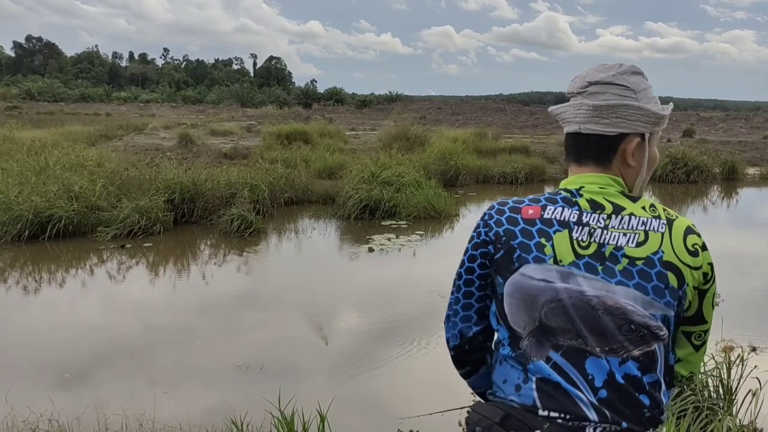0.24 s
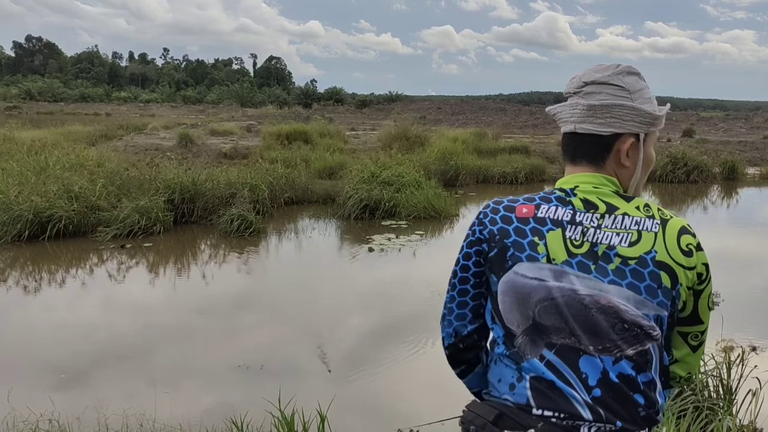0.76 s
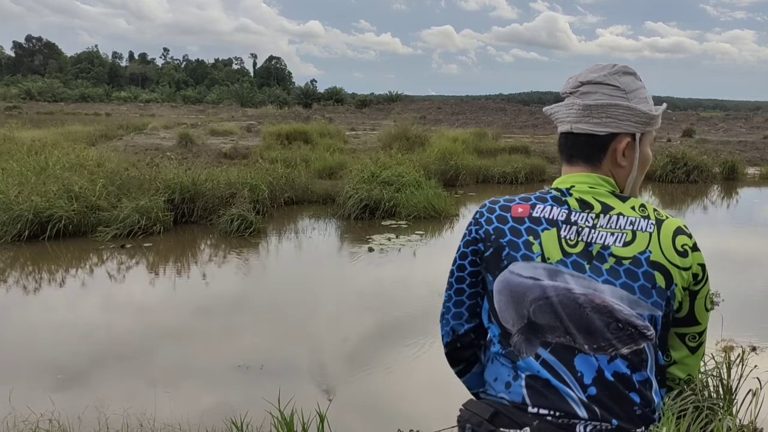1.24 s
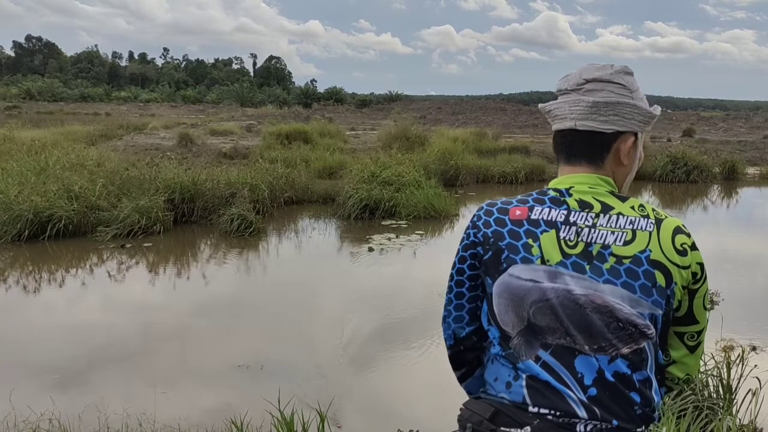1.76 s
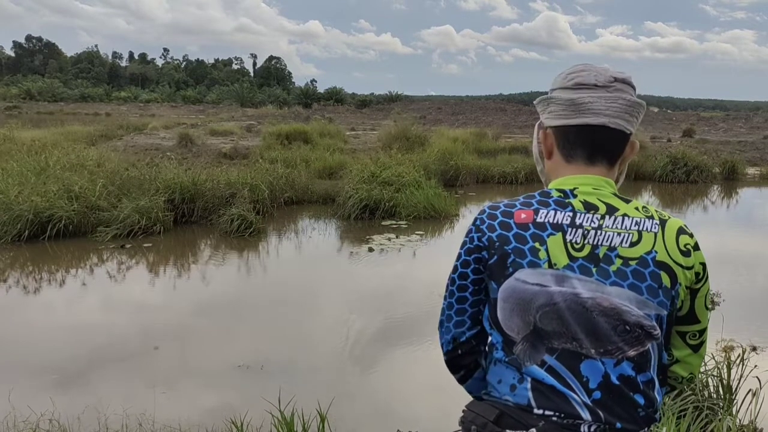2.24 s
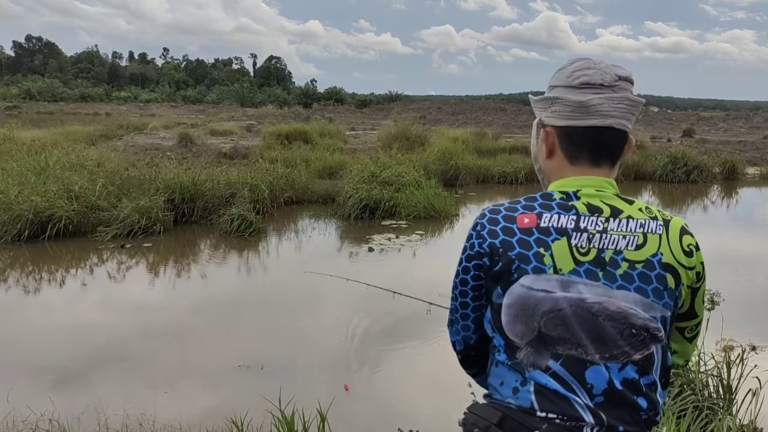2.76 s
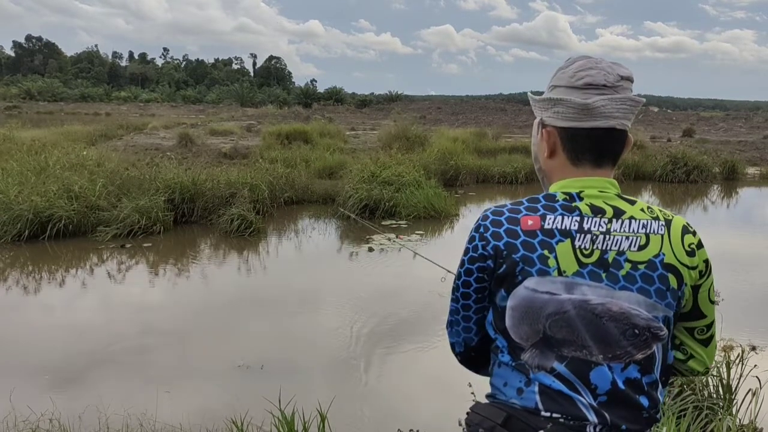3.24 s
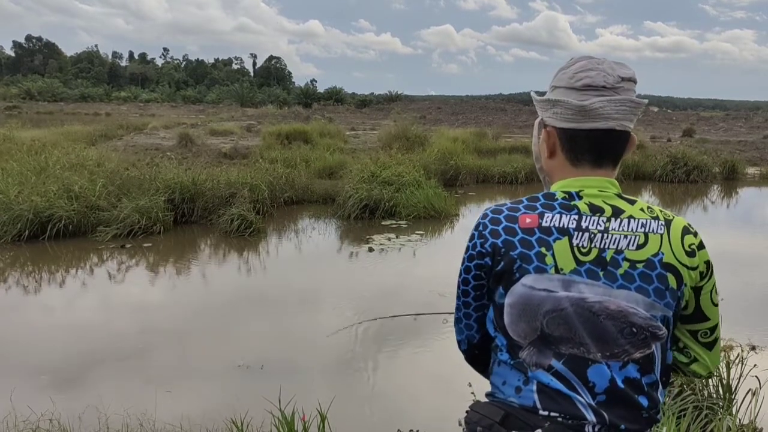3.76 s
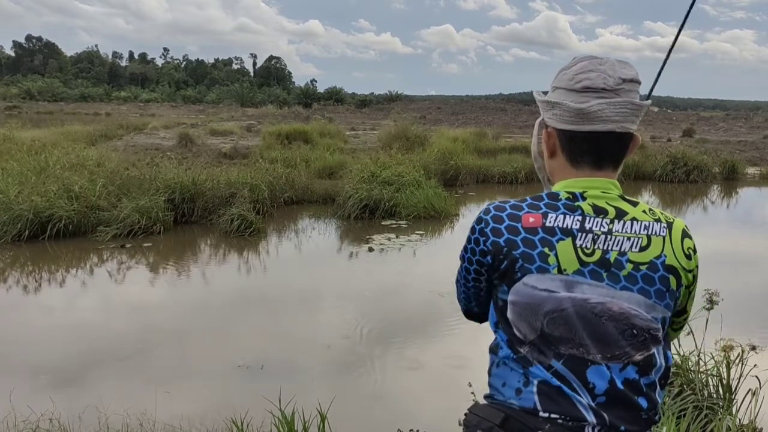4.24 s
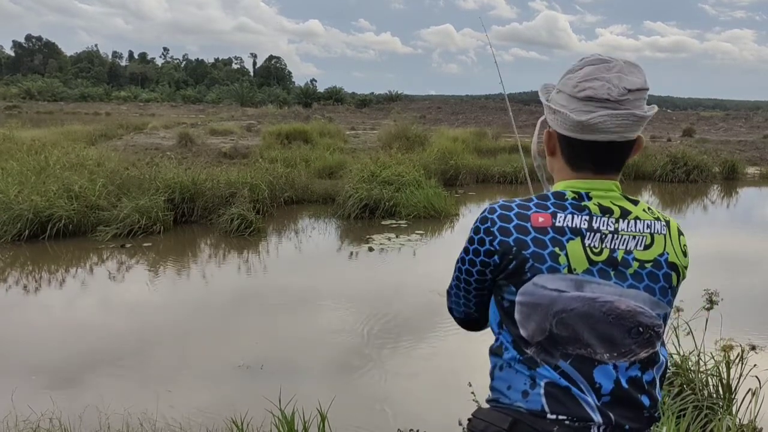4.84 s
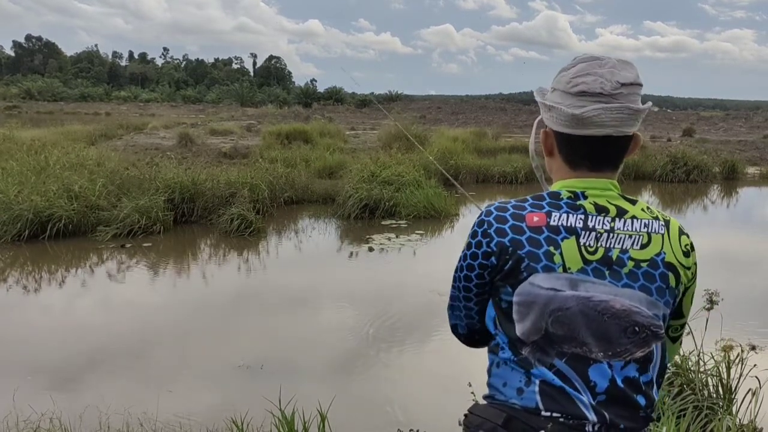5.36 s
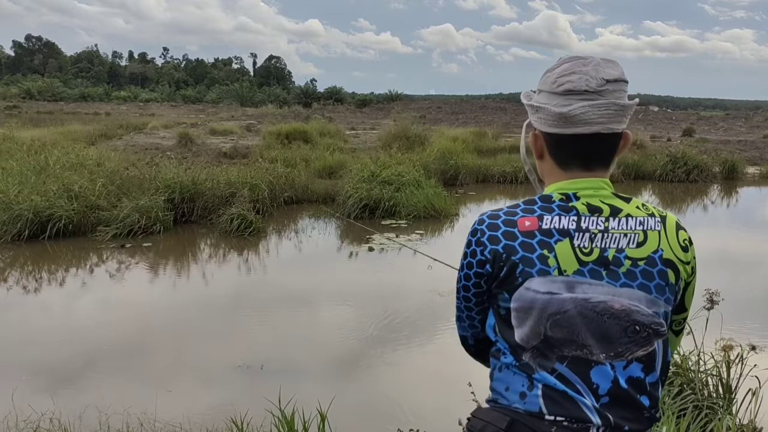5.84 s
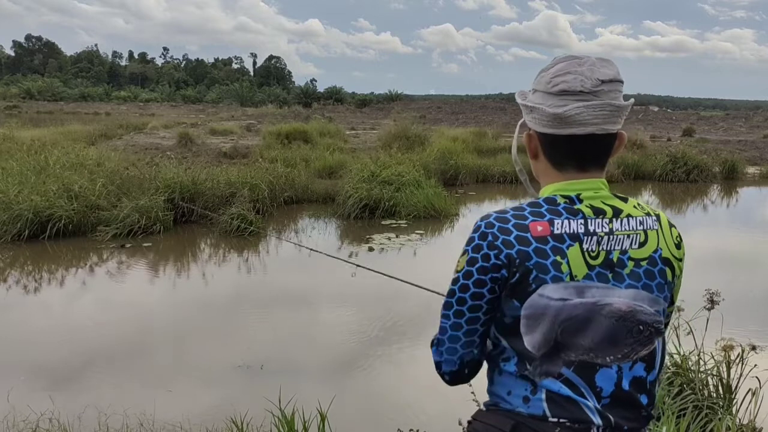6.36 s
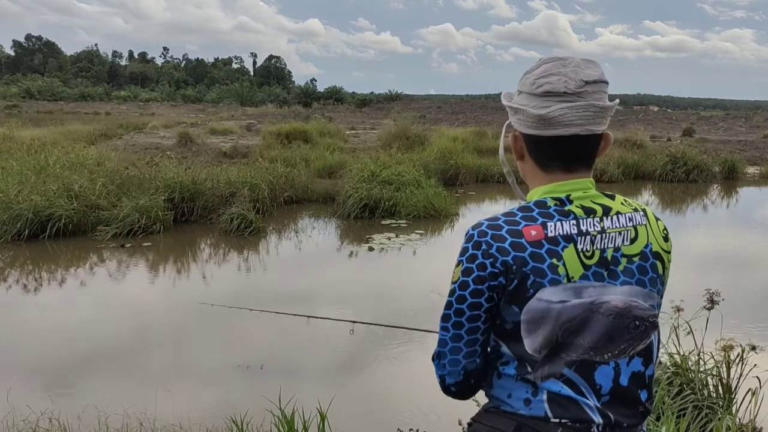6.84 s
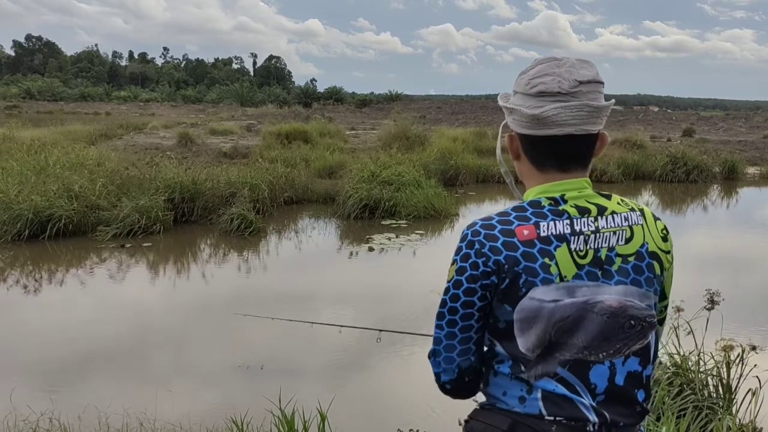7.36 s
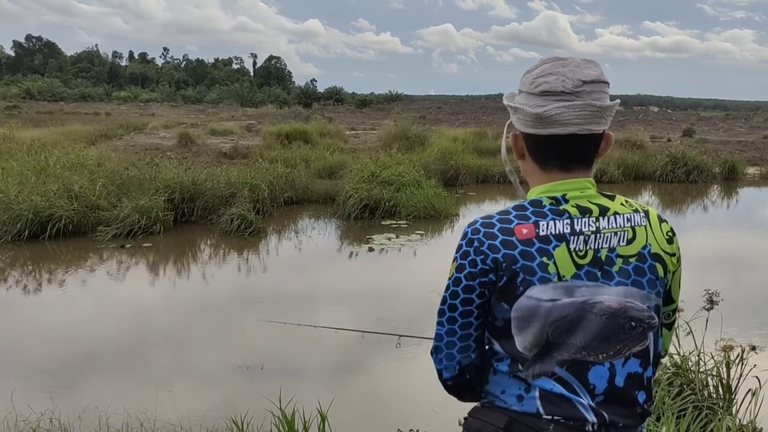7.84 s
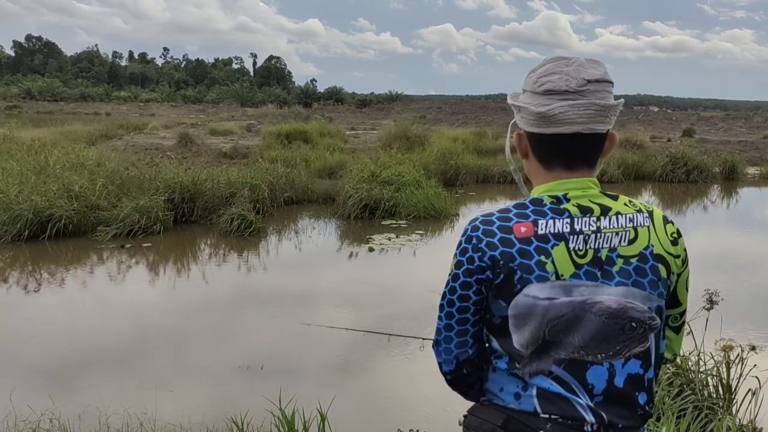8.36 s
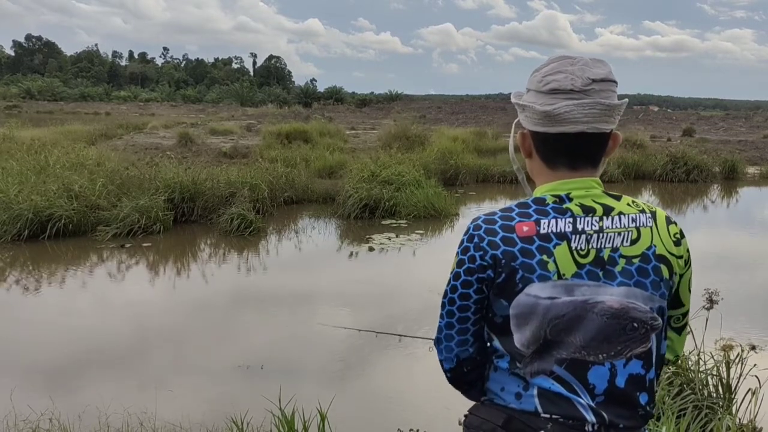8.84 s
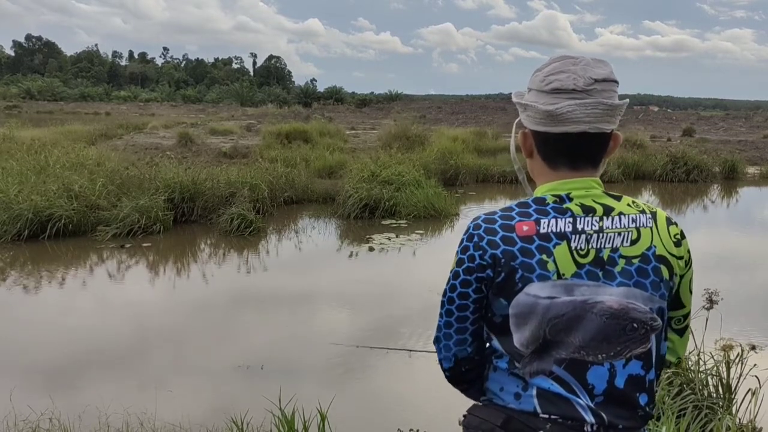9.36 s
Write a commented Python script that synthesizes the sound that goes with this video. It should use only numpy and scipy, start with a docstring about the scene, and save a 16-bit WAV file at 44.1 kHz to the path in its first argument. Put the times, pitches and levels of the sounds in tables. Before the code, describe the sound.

Breezy pond bank: bassy wind thumps in stereo, a thin high cricket shimmer throughout, scattered quick bird notes, small plops and one faint fishing-line hiss.

```python
"""Gusts buffet two microphone ports over a far rumble, on the bank of an open marsh pool on a breezy day.
Wind is coloured noise in swelling lumps, with single eddies as filtered pressure bumps.
Crickets rasp and trill in the grass as tones pulsed by wing strokes, before a chorus of band noise.
Two songbirds whistle and warble from the bushes as gliding tones with faint scattered echoes.
An angler's cast hisses as decaying noise; now and then the water plops as a ringing bubble."""
import sys
import numpy as np
from scipy import signal
from scipy.fft import rfft, irfft, next_fast_len
from scipy.io import wavfile
from scipy.ndimage import map_coordinates

SR = 44100
rng = np.random.default_rng(int(sys.argv[2]) if len(sys.argv) > 2 else 0)


def master_out(mix):
    """Clip the mix to full scale and print it as 16-bit PCM to the path in sys.argv[1]."""
    frames = np.transpose(np.atleast_2d(mix))
    ceiling = np.clip(frames, -1, 1)
    pcm = np.round(ceiling * 32767).astype(np.int16)
    wavfile.write(sys.argv[1], SR, pcm)


N = 422919
TIME = np.arange(N) / SR  # s


def from_db(db):
    """Amplitude ratio: 20 dB is a factor of ten."""
    return 10 ** (np.asarray(db) / 20)


def rms_one(x):
    """Normalisation to unit mean power."""
    return x / np.sqrt(np.mean(x ** 2) + 1e-20)


def in_time(rows):
    """Linear interpolation: each column of a curve at every sample."""
    s, *columns = np.transpose(rows)
    return [np.interp(TIME, s, column) for column in columns]


def at_hz(points, hz):
    """Interpolation of a spectrum along a logarithmic frequency axis."""
    f, value = np.transpose(points)
    return np.interp(np.log(hz + 1e-9), np.log(f), value)


def drift(rate):
    """Slow random process: a smooth curve of spread near 1 through `rate` random knots per second."""
    knots = rng.standard_normal(int(N / SR * rate) + 2)
    return map_coordinates(knots, [TIME * rate], order=2, mode="nearest")


def band(x, low_hz, high_hz, order=2):
    """Causal Butterworth band-pass: the filter responds only after its input."""
    sos = signal.butter(order, [low_hz, min(high_hz, SR / 2 - 10)], "band", fs=SR, output="sos")
    return signal.sosfilt(sos, x + 1e-18)


def noise(spectrum, likeness=None):
    """Partially coherent noise: the balance of mid and side sets the left-right correlation; rms 1."""
    size = next_fast_len(N)
    hz = np.arange(size // 2 + 1) * SR / size
    mid, side = rfft(rng.standard_normal((2, size)))
    alike = np.clip(at_hz(likeness, hz), -1, 1) if likeness else 0
    pair = np.sqrt(1 + alike) * mid + np.sqrt(1 - alike) * side * [[1], [-1]]
    coloured = pair * from_db(at_hz(spectrum, hz))
    return rms_one(irfft(coloured, size)[:, :N])


def panned(pan_db):
    """Constant-power panning: left and right gains that differ by pan_db."""
    gains = from_db(np.array([[.5], [-.5]]) * pan_db)
    return gains / np.sqrt(np.mean(gains ** 2, axis=0))


def scatter(x, t60):
    """Diffuse scattering: countless weak, decaying reflections, different at each port."""
    t = TIME[:SR]
    echoes = rng.standard_normal((2, SR)) * from_db(-60 * t / t60)
    echoes /= np.sqrt(np.sum(echoes ** 2, axis=1, keepdims=True))
    return signal.fftconvolve(x[None], echoes, axes=1)[:, :N]


def distant_air(level_db):
    """Diffuse field: far noise reaches both ports with a correlation that depends on frequency."""
    # spectrum of the far background: f/Hz, relative level/dB
    air_colour = [(25, -46), (50, -4), (80, -1), (120, 1.5), (190, -1.5), (300, -14), (380, -12.5),
                  (480, -11.5), (750, -17), (1050, -22.5), (2300, -24), (3600, -25.5), (5500, -33.5),
                  (11000, -33.5), (15500, -30.5)]
    # likeness of the background at the two ports: f/Hz, correlation
    port_likeness = [(60, 0.97), (160, 0.94), (450, 0.7), (740, 0.057), (1220, -0.22), (2000, 0.4),
                     (3300, -0.16), (5500, 0.02)]
    return from_db(level_db) * noise(air_colour, port_likeness) * from_db(.5 * drift(6.5))


def wing_strokes(pitch_hz, strokes_per_s, rasp_hz):
    """Stridulation: a file drawn over a scraper gives one short, slightly rough tone for each stroke."""
    stroke = np.cumsum(strokes_per_s * (1 + 0.0241 * drift(6.8))) / SR
    wander_hz = 18 * drift(25)
    roughness_hz = rasp_hz * drift(600)
    tone = np.sin(2 * np.pi * np.cumsum(pitch_hz + wander_hz + roughness_hz) / SR)
    return tone * np.sin(np.pi * stroke) ** 2


def chirping(count, duty, low_hz, rise_hz, strokes_per_s):
    """Amplitude modulation: wing strokes grouped in bursts, each rising in pitch."""
    progress = np.minimum((count + .25) % 1 / duty, 1)  # stays at 1, silent, until the next chirp
    burst = np.sqrt(abs(np.sin(np.pi * progress)))
    return burst * wing_strokes(low_hz + rise_hz * progress ** 2, strokes_per_s, rasp_hz=44.3)


def in_grass(insect, level_db, pan_db):
    """Direct and scattered sound: an insect is heard partly straight and partly through the stems."""
    heard = insect + .65 * scatter(insect, t60=.05)
    return from_db(level_db) * panned(pan_db) * rms_one(heard)


def crickets():
    """Superposed stridulation: four chirpers, two on one beat, and a triller before a far noise chorus."""
    # tempo of the slow cricket and its neighbour: t/s, rate/(chirps per s)
    tempo = [(0, 9.6), (1.5, 8.3), (5, 8.15), (5.4, 8.68), (9.59, 8.25)]
    # spectrum of the far chorus: f/Hz, relative level/dB
    chorus_colour = [(6000, -32), (6900, -10.5), (7250, -9.5), (7700, 2), (8050, -3), (8450, -9),
                     (9300, -13.5), (11000, -28.5)]
    beat = np.cumsum(in_time(tempo)[0]) / SR
    quick_beat = 12.1 * TIME + .08 * drift(1)
    quickest_beat = 14.6 * TIME + .1 * drift(1)
    slow = chirping(beat, duty=.62, low_hz=7275, rise_hz=230, strokes_per_s=145)
    neighbour = chirping(beat, duty=.62, low_hz=8150, rise_hz=250, strokes_per_s=125)
    quick = chirping(quick_beat, duty=.55, low_hz=7420, rise_hz=130, strokes_per_s=146)
    quickest = chirping(quickest_beat, duty=.7, low_hz=7880, rise_hz=100, strokes_per_s=91)
    trill = wing_strokes(pitch_hz=7745, strokes_per_s=91, rasp_hz=28)
    near = in_grass(slow, level_db=-64, pan_db=15) + in_grass(trill, level_db=-64.5, pan_db=20)
    further = (in_grass(quick, level_db=-66, pan_db=20)
               + in_grass(quickest, level_db=-68.5, pan_db=17)
               + in_grass(neighbour, level_db=-78, pan_db=-3))
    chorus = from_db(-61.5) * panned(-1) * noise(chorus_colour) * from_db(.5 * drift(13))
    return near + further + chorus


def plops(level_db, t60, pitch_rise_per_s):
    """Bubble resonance: a bubble rings briefly and rises in pitch as it nears the surface."""
    # small plops in the water: t/s, starting f/Hz, relative level/dB
    bubbles = [(.397, 1820, -65), (.785, 1125, -68.5), (1.032, 1200, -67), (1.687, 1114, -69),
               (6.26, 1480, -66), (6.329, 750, -62)]
    out, t = np.zeros(N), TIME[:SR // 10]
    envelope = from_db(-60 * t / t60) * (1 - np.exp(-t / .001))
    for s, hz, plop_db in bubbles:
        cycles = hz * t * (1 + pitch_rise_per_s / 2 * t)  # integral of a linear rise
        start = int(s * SR)
        out[start:start + len(t)] += from_db(plop_db + level_db) * np.sin(2 * np.pi * cycles) * envelope
    return out + from_db(-5) * scatter(out, t60=.12)


def cast(start_s, level_db):
    """Friction noise: fishing line hisses briefly through the rod rings."""
    age = np.maximum(TIME - start_s, 0)
    hiss = rms_one(band(rng.standard_normal((2, N)), 4000, 15000))
    envelope = np.exp(-age / .05) * (1 - np.exp(-age / .004))
    return from_db(level_db) * hiss * envelope


def wind(level_db, lump_db, lumps_per_s):
    """Turbulence noise: gust powers add to a light breeze, in lumps that differ at each port."""
    # light breeze between gusts, with a lull after six seconds: t/s, relative level/dB
    breeze = [(0, -51), (2.2, -62), (5.7, -66), (6.3, -80), (7.3, -69), (7.8, -52.5), (9.59, -55.5)]
    # gusts: crest t/s, length/s (the 1/e times of rise and fall together), relative level/dB, left-right/dB
    gusts = [(0.04, 0.6, -43, 5), (0.137, 0.2, -37, -5), (0.535, 0.085, -39, -24), (0.827, 0.12, -49, 0),
             (1.336, 0.28, -36.5, 2), (1.694, 0.11, -36, -20), (2.944, 0.11, -45.5, 7),
             (3.407, 0.083, -40, 15), (3.635, 0.27, -43, 5), (4.374, 0.15, -45.5, -10),
             (4.586, 0.22, -50, -8), (5.073, 0.11, -37, 21), (5.249, 0.17, -35.5, -26),
             (5.67, 0.39, -52.5, -1), (7.637, 0.14, -40.5, -8.5), (8.424, 0.11, -43.5, -3),
             (8.596, 0.07, -42, 18), (8.853, 0.069, -50.5, 4), (9.042, 0.19, -48.5, -23),
             (9.44, 0.11, -44.5, -23)]
    # spectrum of the turbulence: f/Hz, relative level/dB
    wind_colour = [(25, -33), (45, -29), (65, -4.5), (90, 1), (125, 0.5), (180, -12), (260, -26.5),
                   (400, -34), (800, -61)]
    rise_share = 0.49  # part of a gust's length before its crest
    power = from_db(in_time(breeze)[0]) ** 2 * np.ones((2, 1))
    for s, length, gust_db, pan_db in gusts:
        away = (TIME - s) / (length * np.where(TIME < s, rise_share, 1 - rise_share))
        swell = np.exp(-np.minimum(away ** 2, 20))
        power += (from_db(gust_db) * swell * panned(pan_db)) ** 2
    lumps = from_db(lump_db * np.array([drift(lumps_per_s), drift(lumps_per_s)]))
    return from_db(level_db) * np.sqrt(power) * rms_one(noise(wind_colour) * lumps)


def buffets(level_db, width_s, low_hz, high_hz):
    """Impulse response: an eddy's pressure bump becomes a short wobble through the microphone's bass cut."""
    # single eddies that hit a port: t/s, relative peak level/dB, left-right/dB
    eddies = [(0.208, -22.5, -16), (1.335, -29, 15), (1.372, -8.5, 22), (3.59, -25, 19), (5.213, -17, -31),
              (5.246, -14, -30), (7.606, -26.5, -12), (8.701, -19.5, -26)]
    out = np.zeros((2, N))
    for s, peak_db, pan_db in eddies:
        bump = np.exp(-np.minimum(((TIME - s) / width_s) ** 2, 20))
        wobble = band(bump, low_hz, high_hz, order=3)
        out += wobble / abs(wobble).max() * from_db(peak_db + level_db) * panned(pan_db)
    return out


def span(s, length):
    """Normalised time: the samples of a note, and its progress from 0 to 1."""
    at = np.nonzero((TIME > s) & (TIME < s + length))[0]
    return at, (TIME[at] - s) / length


def note(hz, progress, peak_share):
    """Phase is the integral of frequency: a bird tone with a weak third harmonic swells and falls."""
    phase = 2 * np.pi * np.cumsum(hz) / SR
    rise_and_fall = np.interp(progress, [0, peak_share, 1], [0, 1, 0])
    swell = np.sin(np.pi / 2 * rise_and_fall) ** 0.29
    return swell * (np.sin(phase) + from_db(-21.5) * np.sin(3 * phase))


def warbles(rows):
    """Frequency modulation: pitch dips repeatedly below a gliding crest; the last upstroke is held."""
    cycles_per_swing, swing_uneven = 54, 0.278  # low notes swing slower; spread in swings
    crest_hold_s, crest_dwell = .017, 1.2  # dwell above 1: pitch lingers near the crest
    flutter_hz, throb_db = 140, 2.5  # random flutter of pitch and of loudness
    dip_db = 2  # louder at the bottom of each swing
    voice, unsteady, flutter = np.zeros(N), drift(120), drift(700)
    for s, length, first_hz, last_hz, swing_hz, note_db in rows:
        at, progress = span(s, length)
        to_go = np.maximum((1 - progress) * length - crest_hold_s, 0)
        jitter = swing_uneven * unsteady[at] * np.sqrt(to_go / length)
        swings = last_hz / cycles_per_swing * to_go + jitter
        dip = (np.sin(np.pi * swings) ** 2) ** crest_dwell
        crest_hz = last_hz + (first_hz - last_hz) * to_go / length
        hz = crest_hz - swing_hz * dip + flutter_hz * flutter[at]
        loudness = from_db(note_db + dip_db * dip + throb_db * unsteady[at])
        voice[at] += loudness * note(hz, progress, peak_share=0.5)
    return voice


def whistles(rows):
    """Frequency glide: pitch slides quickly onto the held note and bends away as it ends."""
    slide_power, waver_hz = 2.18, 22
    voice, waver = np.zeros(N), drift(150)
    for s, length, first_hz, held_hz, last_hz, note_db in rows:
        at, progress = span(s, length)
        end_hz = np.where(progress < .5, first_hz, last_hz)
        slide_hz = (end_hz - held_hz) * abs(2 * progress - 1) ** slide_power
        hz = held_hz + slide_hz + waver_hz * waver[at]
        voice[at] += from_db(note_db) * note(hz, progress, peak_share=.56)
    return voice


def song(bird):
    """Superposition: all the warbles and whistles of one bird add up."""
    # fast-swinging notes: t/s, length/s, crest glide from f/Hz, to f/Hz, swing/Hz, level/dB, bird
    warble_rows = [(0.015, 0.073, 3670, 3230, 403, -60.5, "right"),
                   (.262, 0.076, 3350, 3390, 604, -54, "right"),
                   (0.443, .068, 2640, 2740, 350, -60.5, "right"),
                   (.468, 0.083, 3360, 3545, 598, -54, "right"),
                   (0.733, 0.082, 3345, 3377, 557, -56, "right"),
                   (.905, 0.055, 2450, 2615, 300, -60, "right"),
                   (0.926, .092, 3740, 3450, 520, -51.5, "right"),
                   (1.063, 0.04, 3500, 3400, 604, -62, "right"),
                   (1.242, 0.059, 3440, 3465, 546, -55, "right"),
                   (4.458, 0.069, 2125, 2195, 251, -65, "left"),
                   (5.093, .06, 2640, 2910, 680, -54.5, "right"),
                   (5.15, 0.091, 3500, 3700, 527, -54, "right"),
                   (5.357, .038, 3720, 3690, 397, -52.5, "right"),
                   (5.529, 0.064, 2600, 2920, 717, -53.5, "right"),
                   (5.585, .072, 3510, 3620, 380, -49, "right"),
                   (5.713, 0.047, 2790, 2630, 550, -56.5, "right"),
                   (6.05, 0.099, 3650, 3597, 460, -50.5, "right"),
                   (8.003, 0.069, 2620, 2645, 230, -62, "left"),
                   (8.201, 0.042, 3140, 2850, 250, -64.5, "left"),
                   (8.511, 0.057, 3150, 3130, 402, -62, "left"),
                   (8.809, 0.083, 3100, 2860, 498, -66.5, "left"),
                   (9.001, 0.045, 2600, 2400, 400, -61, "right"),
                   (9.09, .06, 3200, 3150, 297, -59, "right"), (9.38, 0.075, 2900, 2890, 403, -62, "right"),
                   (9.495, 0.049, 3220, 3140, 550, -55, "right")]
    # clear notes: t/s, length/s, first f/Hz, held f/Hz, last f/Hz, level/dB, bird
    whistle_rows = [(0.239, 0.025, 2800, 3260, 3200, -51, "right"),
                    (.303, 0.023, 2750, 2220, 2150, -60, "right"),
                    (0.333, 0.047, 2490, 2665, 2820, -49, "right"),
                    (0.569, .03, 2670, 2606, 2620, -51, "right"),
                    (0.753, 0.044, 2760, 3000, 2940, -48, "right"),
                    (1.215, 0.073, 2990, 2965, 2975, -47.5, "right"),
                    (1.615, .06, 2340, 2295, 2270, -59.5, "left"),
                    (1.936, .046, 2600, 2845, 3100, -55.5, "right"),
                    (2.011, .068, 3180, 3407, 3180, -54, "right"),
                    (2.236, 0.046, 3160, 3030, 2980, -62, "right"),
                    (2.632, .048, 3150, 3030, 3010, -60, "left"),
                    (2.958, 0.056, 3120, 3100, 2930, -63.5, "left"),
                    (4.745, 0.067, 3235, 3240, 3240, -48, "right"),
                    (5.147, 0.054, 2464, 2597, 2570, -48, "right"),
                    (5.394, 0.05, 4640, 3965, 3960, -50, "right"),
                    (5.58, 0.069, 2160, 2450, 2480, -53.5, "right"),
                    (5.751, 0.036, 2910, 3170, 3520, -48, "right"),
                    (5.859, 0.072, 3130, 3010, 2920, -50.5, "right"),
                    (6.828, .075, 2540, 3225, 2670, -57.5, "left"),
                    (7.743, 0.011, 3600, 3310, 3050, -53, "left"),
                    (7.75, 0.035, 3320, 2880, 3550, -55, "left"),
                    (7.955, .026, 3120, 3200, 3330, -63, "left"),
                    (8.322, 0.022, 3480, 3200, 2650, -52.5, "left"),
                    (8.655, 0.162, 3530, 3720, 3660, -66, "left"),
                    (9.023, 0.055, 2660, 2693, 2700, -51.5, "right"),
                    (9.551, 0.017, 3320, 3010, 2750, -48, "right")]
    own_warbles = [row[:-1] for row in warble_rows if row[-1] == bird]
    own_whistles = [row[:-1] for row in whistle_rows if row[-1] == bird]
    return warbles(own_warbles) + whistles(own_whistles)


def from_bush(voice, left_lag, pan_db):
    """Arrival-time difference: the left port hears left_lag samples later; reeds and far trees echo."""
    direct = np.array([np.roll(voice, left_lag), voice]) * panned(pan_db)
    reeds = from_db(-7) * scatter(voice, t60=0.1)
    trees = from_db(-7) * scatter(voice, t60=0.78)
    return direct + reeds + trees


def birds():
    """Spatial separation: level and arrival time place two birds on opposite sides."""
    right = from_bush(song("right"), left_lag=22, pan_db=-2)
    left = from_bush(song("left"), left_lag=-18, pan_db=2)
    return right + left


def scene():
    """Linear superposition: far air, insects, water, the cast, wind on the ports and birds."""
    background = distant_air(level_db=-54.5) + crickets()
    water = plops(level_db=11, t60=0.072, pitch_rise_per_s=16)
    angler = cast(start_s=4.695, level_db=-64)
    gusts = wind(level_db=3.5, lump_db=6, lumps_per_s=30)
    eddies = buffets(level_db=-8.5, width_s=0.0016, low_hz=77, high_hz=316)
    return background + water + angler + gusts + eddies + birds()


def record(dry):
    """Elliptic low-pass: the treble is cut steeply above 15550 Hz."""
    return signal.sosfilt(signal.ellip(18, .1, 90, 15550, fs=SR, output="sos"), dry)


dry = scene()
out = record(dry)
master_out(out)
```